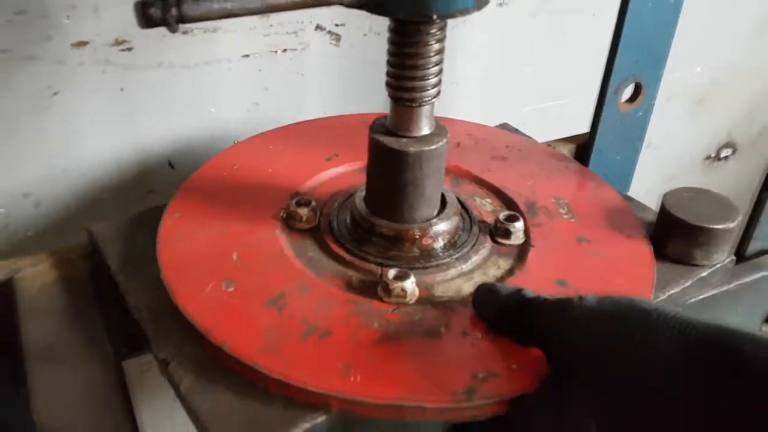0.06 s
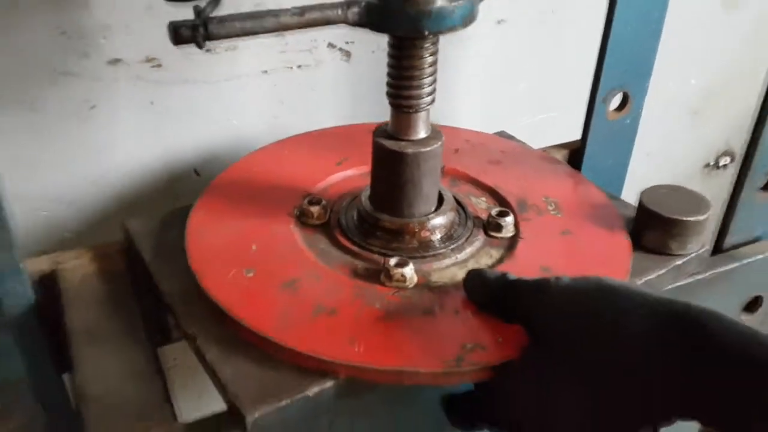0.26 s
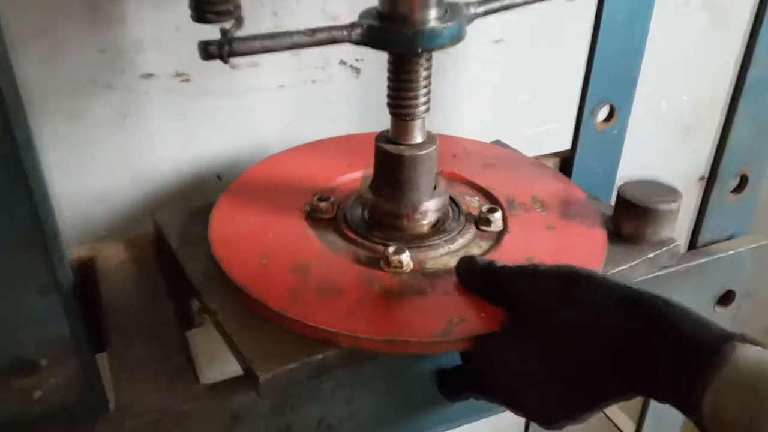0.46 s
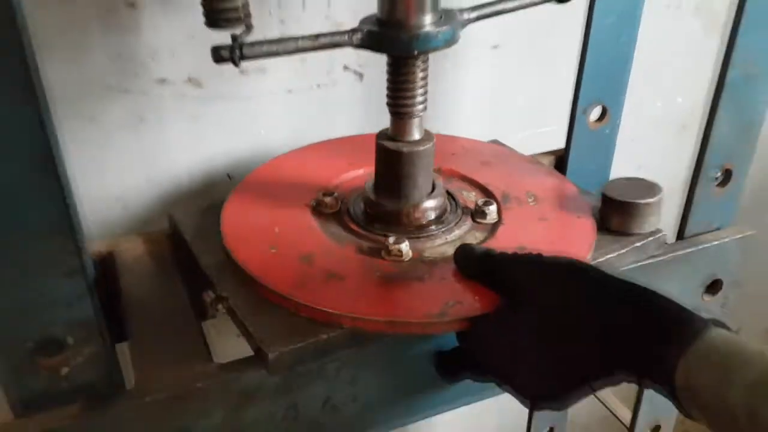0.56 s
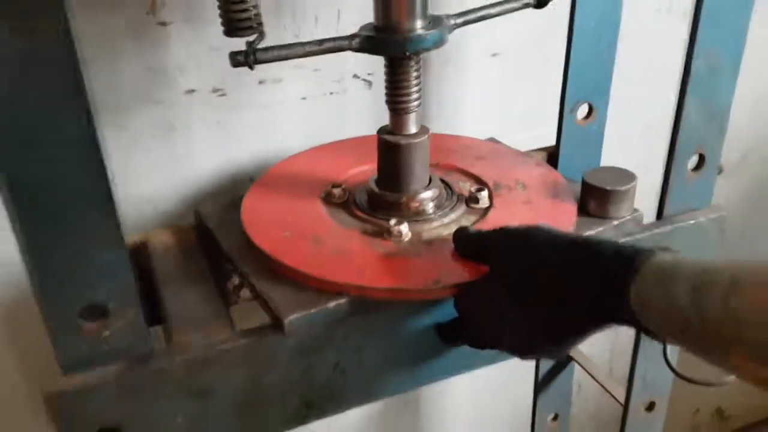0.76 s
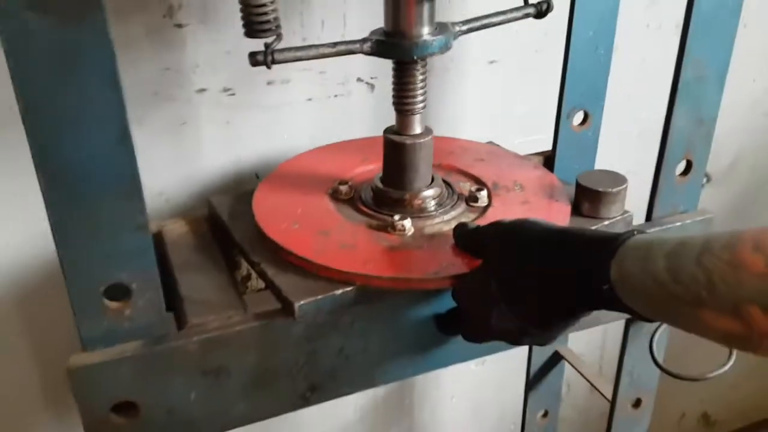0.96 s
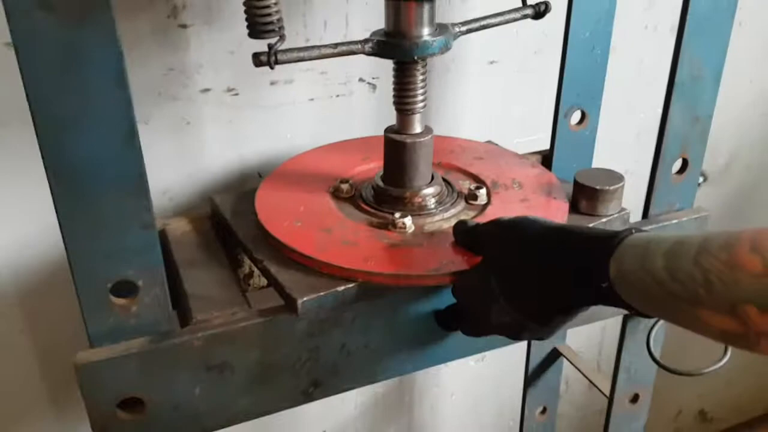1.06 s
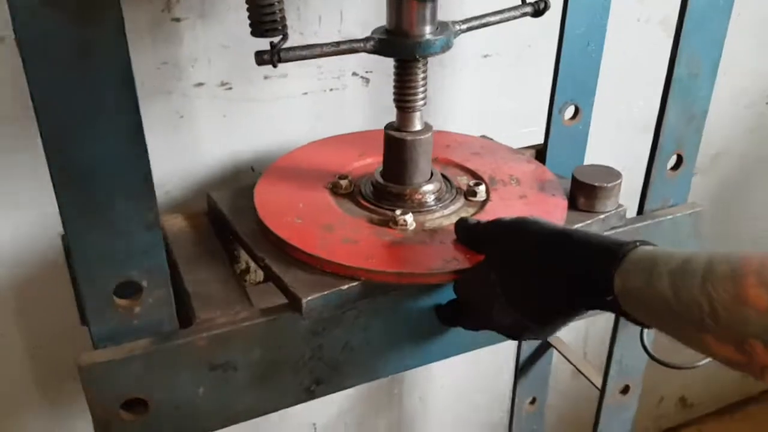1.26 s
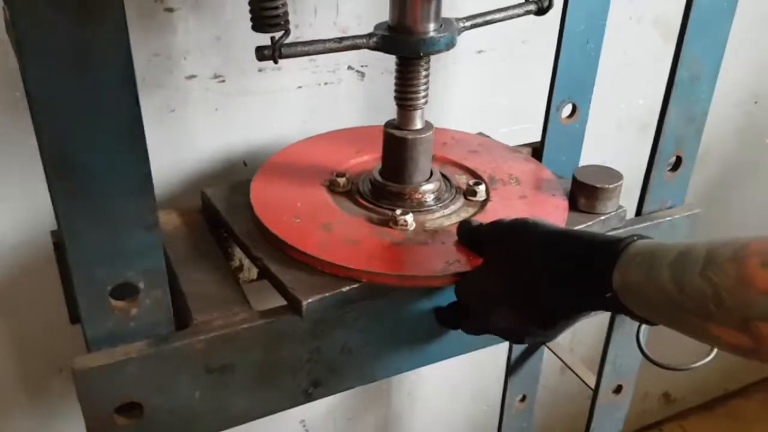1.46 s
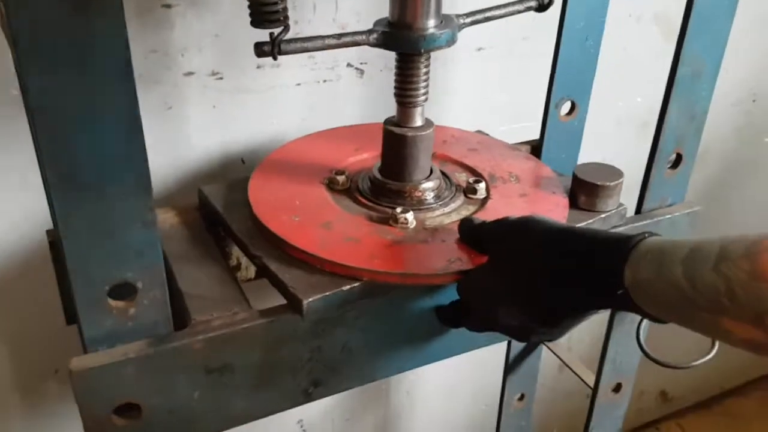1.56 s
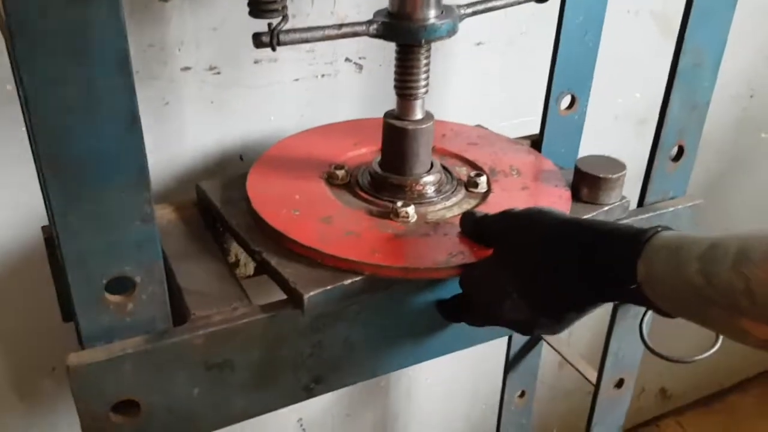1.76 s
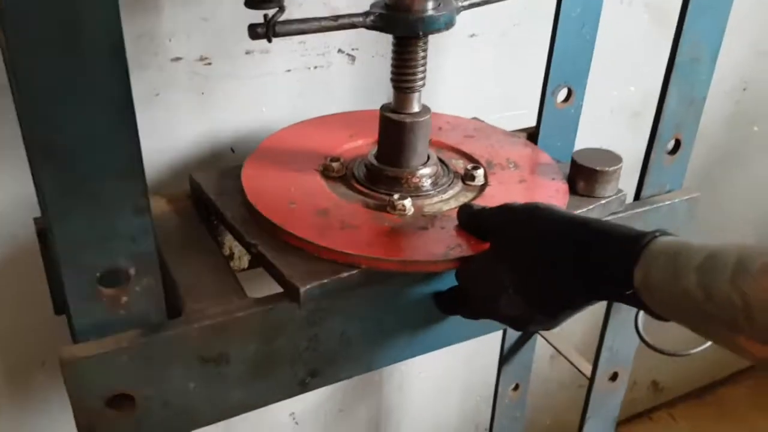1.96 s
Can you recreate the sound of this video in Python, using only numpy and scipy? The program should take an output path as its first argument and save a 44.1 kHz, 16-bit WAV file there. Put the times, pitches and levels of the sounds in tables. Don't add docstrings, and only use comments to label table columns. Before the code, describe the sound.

A wheel hub cracks out of its bearing in a press, already ringing at the start, then a short bright jolt and a longer stuttering one, with lever clacks between, close in a hard-walled workshop.

```python
import sys
import numpy as np
from scipy import signal
from scipy.fft import rfft, irfft, next_fast_len
from scipy.io import wavfile

SR = 44100
rng = np.random.default_rng(int(sys.argv[2]) if len(sys.argv) > 2 else 0)


def store_wav(level_fs):
    pcm = np.round(np.clip(np.atleast_2d(level_fs), -1, 1) * 32767)
    wavfile.write(sys.argv[1], SR, pcm.T.astype(np.int16))


def undo_db(level):
    steps = np.asarray(level, float) / 20
    return 10 ** steps


N = 89258

# (frequency [Hz], left-right likeness [-1 to 1])
LIKENESS = [(60, 0.74), (150, 0.89), (380, 0.98), (950, 0.35), (2380, -0.11), (5980, 0.5), (15000, -0.55)]
# (frequency [Hz], level [dB])
LEFT_OVER_RIGHT = [(60, 8), (180, 1), (550, -1), (1650, 5.5), (4970, 7), (15000, -0.5)]
# (time [s], level [dB], length of slip run [s], tilt [dB per octave], frame level [dB])
JOLTS = [
    (-.035, -16.5, 0.0074, 3.5, -12.5),
    (.693, -19, 0.014, -0.16, -4),
    (1.326, -19.5, 0.16, 0, 0),
]
TREBLE_LAG_S = .005


def at_hz(points, hz):
    table = np.array(points)
    return np.interp(np.log(hz), np.log(table[:, 0]), table[:, 1])


def port_gain(hz):
    return undo_db(at_hz(LEFT_OVER_RIGHT, hz) * np.array([[.5], [-.5]]))


def rms_one(x):
    return x / np.sqrt(np.mean(x ** 2) + 1e-20)


def energy_one(x):
    return x / np.sqrt(np.sum(x ** 2) / 2 + 1e-20)


def through(x, response):
    return signal.fftconvolve(np.atleast_2d(x), response, axes=1)[:, :x.shape[-1]]


def bandpass(x, order, low_hz, high_hz):
    return signal.sosfilt(signal.butter(order, [low_hz, high_hz], "band", fs=SR, output="sos"), x)


def stored(energy, t60):
    return signal.lfilter([1], [1, -undo_db(-120 / (max(t60, .002) * SR))], energy + 1e-18)


def banded_noise(spectrum, shape=lambda hz: 1, size=N):
    out = 0
    edges = 22 * 2 ** np.arange(0, 9.8, 1 / 3)
    white = rng.standard_normal((2, 2, size + 4000))
    for k, (low, high) in enumerate(zip(edges, edges[1:])):
        mid, side = bandpass(white[k % 2], 2, low, high)[:, 4000:]
        hz = np.sqrt(low * high)
        alike = np.clip(at_hz(LIKENESS, hz), -.1, 1)
        both = np.sqrt(1 + alike) * mid + np.sqrt(1 - alike) * side * [[1], [-1]]
        out = out + undo_db(at_hz(spectrum, hz)) * port_gain(hz) * shape(hz) * both
    return out


def hum(x, peaks):
    out = x
    for hz, width_hz, db in peaks:
        r = np.exp(-np.pi * width_hz / SR)
        poles = [1, -2 * r * np.cos(2 * np.pi * hz / SR), r * r]
        out = out + undo_db(db) * signal.lfilter([(1 - r * r) / 2, 0, (r * r - 1) / 2], poles, x)
    return out


def ringing(modes, longest, spread_db=2):
    t, out = np.arange(SR) / SR, 0
    for hz, db, t60 in modes:
        turn = np.arccos(np.clip(at_hz(LIKENESS, hz), -1, 1)) * np.array([[0], [1]])
        fall_db = 60 * t / min(t60, longest)
        gain = undo_db(db + spread_db * rng.standard_normal() - fall_db) * port_gain(hz)
        rise = 1 - np.exp(-t / (TREBLE_LAG_S * min(hz / 2000, 1) ** 2))
        out = out + gain * rise * np.sin(2 * np.pi * hz * t + turn + rng.uniform(-1.18, 1))
    return out / np.sqrt(np.mean(out[:, :SR // 20] ** 2))


def floor():
    # (frequency [Hz], density [dB per Hz])
    spectrum = [(20, -37), (60, -66), (300, -10.5), (640, -7), (1100, -17), (1900, -10.5), (5000, -24),
                (16000, -67)]
    return undo_db(-43) * rms_one(banded_noise(spectrum))


def workshop():
    # (frequency [Hz], t60 [s])
    t60s = [(100, 0.5), (400, 1.21), (1500, 1.74), (5000, 0.65), (14000, 1.52)]
    # (frequency [Hz], level [dB])
    colour = [(60, 1.5), (400, 2.5), (2000, -2), (6000, -1), (15000, -12)]
    size = 3 * SR // 2
    age, onset_s = np.arange(size) / SR, 0.006

    def dying(hz):
        return undo_db(-60 * age / max(at_hz(t60s, hz), .01))
    return energy_one(banded_noise(colour, dying, size=size) * (1 - np.exp(-age / onset_s)))


def room_sound(wet):
    # (frequency [Hz], width [Hz], level [dB])
    modes = [(1733, 57, 4), (642.3, 25, -1), (388.7, 7.6, -5.5), (575, 6.7, 2.5), (252, 13.3, 1.5)]
    # (time [s], level [dB])
    heard = [
        (0, 2.5),
        (.55, 0.5),
        (1.3, 2),
        (1.7, -3),
        (1.82, -4.5),
        (2.02, -0.5),
    ]
    gain = undo_db(np.interp(np.arange(N) / SR, *np.transpose(heard)))
    return gain * hum(wet + floor(), modes)


def rumble():
    # (time [s], level [dB])
    strain = [
        (0, -41),
        (.45, -59),
        (.7, -43.5),
        (1.002, -47.5),
        (1.302, -40),
        (1.65, -40.5),
        (1.8, -47.5),
        (2.02, -57),
    ]
    centre_hz, width_hz, broad_db, side_db = 115.3, 64, -16, -20.5
    white = rng.standard_normal((2, 1, N + 8000))
    white = white + undo_db(side_db) * rng.standard_normal((2, 1, N + 8000)) * [[1], [-1]]
    shudder = bandpass(white[0], 1, centre_hz - width_hz / 2, centre_hz + width_hz / 2)[:, 8000:]
    broad = bandpass(white[1], 2, 45, 110)[:, 8000:]
    level = undo_db(np.interp(np.arange(N) / SR, *np.transpose(strain)))
    return level * (rms_one(shudder) + undo_db(broad_db) * rms_one(broad))


def clacks(t):
    # (time [s], level [dB], decay [s], tilt [dB per octave], ring frequency [Hz])
    contacts = [(0.033, -45, 0.0013, 2, 8400), (0.043, -42, 0.0019, 11.5, 8350),
                (0.2215, -39, 0.0033, -3, 9000), (0.2294, -32.5, 0.0045, -0.5, 4870),
                (0.549, -47.5, 0.01, 0, 4160), (0.634, -56, 0.0037, 18, 13100),
                (0.637, -26, 0.0042, 7, 8340), (.638, -32.5, 0.014, -3.5, 517),
                (0.982, -44, 0.024, 4, 10500), (1.009, -35, 0.032, -3.5, 2500),
                (1.046, -19.5, 0.002, 5, 4330), (1.229, -28.5, 0.0059, 3, 2480),
                (1.239, -43, 0.0039, 3, 4440), (1.295, -25.5, 0.0034, 6.5, 13300),
                (1.299, -26, 0.022, -3.5, 2260), (.705, -30.5, 0.0081, 2.5, 5270),
                (1.329, -26, 0.028, -4, 5200), (1.636, -37, 0.0052, -1, 14630),
                (1.641, -37, 0.02, -1.5, 993), (1.669, -32, 0.0072, 1, 3860),
                (1.677, -32.5, 0.0028, -3, 7900), (1.676, -33, 0.0023, -1, 8440),
                (1.9108, -35, 0.0056, 0.5, 4200), (1.993, -22.5, 0.0059, 0.5, 8900),
                (1.997, -31, 0.018, -3.5, 1015)]
    # (frequency [Hz], density [dB per Hz])
    linkage = [(150, -20.5), (500, 1), (1000, 5), (2200, 13), (4400, 7.5), (8500, -5.5), (10500, -7.5),
               (16000, -9.5)]
    # (frequency [Hz], t60 [s])
    linkage_t60 = [(300, 0.37), (2000, 0.33), (6000, 0.25), (14000, 0.33)]
    # (frequency [Hz], width [Hz], level [dB])
    lever_hum = [(8700, 710, -3), (4900, 160, -11), (12700, 110, -25), (5200, 750, -18), (14700, 180, -17)]
    ring_cycles, tail_db = 28, -7
    size, rings, snaps = SR // 4, np.zeros((2, len(t) + SR)), []
    age = np.arange(size) / SR
    for s, db, decay, tilt_db, ring_hz in contacts:
        grit = rng.standard_normal((2, size))
        rise = 1 - np.exp(-age / (0.15 * decay))
        snap = undo_db(db) * np.exp(-age / decay) * rise
        start = np.searchsorted(t, s)
        r, w = undo_db(-60 * ring_hz / (ring_cycles * SR)), 2 * np.pi * ring_hz / SR
        ring = signal.lfilter([1, 0, -1], [1, -2 * r * np.cos(w), r * r], grit * snap)
        rings[:, start:start + size] += port_gain(ring_hz) * np.sqrt(1 - r * r) * ring
        snaps.append((start, snap ** 2, tilt_db))

    def shape(hz):
        energy = np.zeros(len(t) + SR)
        for start, power, tilt_db in snaps:
            energy[start:start + size] += power * undo_db(2 * tilt_db * np.log2(hz / 4000))
        tail = stored(energy, at_hz(linkage_t60, hz)) / (.004 * SR)
        return np.sqrt(energy + undo_db(2 * tail_db) * tail)[:len(t)]
    return rings[:, :len(t)] + undo_db(2) * hum(banded_noise(linkage, shape, size=len(t)), lever_hum)


def pings(t):
    # (time [s], level [dB], frequency [Hz], t60 [s])
    plate_ring = [
        (.700, -20.5, 3025, .3),
        (.704, -28, 3145, .3),
        (1.0462, -14, 4420, .035),
        (1.0, -41, 576, 2.5),
        (1.05, -41, 253, 1.5),
        (.8, -33, 485, .8),
    ]
    # (time [s], level [dB], frequency [Hz], t60 [s])
    struck = [(0.225, -41, 8300, 0.066), (0.23, -28, 4050, 0.054), (.551, -39, 5050, 0.089),
              (.639, -28, 3520, 0.15), (.702, -22.5, 3594, 0.12), (0.766, -29.5, 146.5, 0.25),
              (1.0117, -25, 2650, 0.098), (1.0465, -25.5, 8700, 0.074), (1.047, -39, 2410, 0.043),
              (1.301, -19.5, 3690, 0.25), (1.408, -29.5, 138.7, 0.3), (1.676, -21, 5070, 0.038),
              (1.679, -24.5, 8400, 0.024), (1.911, -36.5, 3730, 0.13), (1.914, -30, 2280, 0.044),
              (1.996, -42, 1770, 0.22), (1.996, -21.5, 2710, 0.086)]
    # (time [s], level [dB], frequency [Hz], t60 [s])
    ticks = [(0.043, -37, 7660, .02), (.044, -34, 8400, .02), (.222, -27, 4980, 0.036),
             (.23, -27, 5000, 0.036), (.231, -38, 6600, 0.045), (0.23, -39, 8450, .03),
             (0.549, -36, 3950, 0.065), (0.55, -47, 6760, 0.14), (.551, -51, 9200, 0.069),
             (0.637, -25, 6050, .03), (.638, -38, 8900, 0.022), (.64, -31, 2120, 0.12),
             (1.015, -47, 4900, 0.087), (1.024, -32, 1680, 0.073), (1.0465, -25, 6750, .025),
             (1.0465, -34, 10900, 0.019), (1.048, -19, 2240, 0.034), (1.229, -33.5, 4200, .04),
             (1.33, -19, 780, 0.11), (1.333, -21, 952, 0.14), (1.642, -48, 5440, .1),
             (1.669, -21, 4020, 0.034), (1.91, -42, 7200, 0.042), (1.995, -56, 5000, .03),
             (1.995, -28, 6130, .03), (1.997, -26, 986, 0.13)]
    twin_ratio = 1.011
    rough, flicker_hz = 0.33, 120
    out = np.zeros((2, len(t)))
    low = signal.butter(2, flicker_hz, fs=SR, output="sos")
    flicker = signal.sosfilt(low, rng.standard_normal((2, len(t))))
    for s, db, hz, t60 in list(plate_ring) + list(struck) + list(ticks):
        age = np.maximum(t - s, 0)
        apart = 1 - np.clip(at_hz(LIKENESS, hz), 0, 1)
        phase, twin_phase = apart * rng.uniform(0, np.pi / 2, (2, 2, 1))
        gain = undo_db(db - 60 * age / t60) * port_gain(hz) * (1 - np.exp(-age * hz / 3))
        turn = 2 * np.pi * hz * age
        out += gain * (np.sin(turn + phase) + 0.21 * np.sin(turn * twin_ratio + twin_phase))
    return out * (1 + rough * rms_one(flicker))


def slip_runs(t):
    # (time [s], level against the jolt [dB])
    larger = [(-.02, -3.5), (.004, -10), (.02, -22), (0.043, -11), (0.692, -2.5), (0.6974, 0.5), (.706, -3),
              (.716, -9.5), (0.736, -23), (.757, -6.5), (1.3265, 0.5), (1.331, -3), (1.341, -0.5),
              (1.348, -3), (1.359, -3.5), (1.378, -8), (1.391, -17), (1.408, -14), (1.42, -24),
              (1.445, -15)]
    slips_per_s, small_db = 250, -16
    small = undo_db(small_db) * rng.choice([-1, 1], len(t)) * (rng.random(len(t)) < slips_per_s / SR)
    runs = []
    for s, db, length, _, _ in JOLTS:
        run = small * (t > s) * np.exp(-(np.maximum(t - s, 0) / length) ** 2)
        opening = [(s, 0)] if s < 0 else []
        for slip_s, slip_db in opening + list(larger):
            if -.002 < slip_s - s < .15:
                run[np.searchsorted(t, slip_s)] = -undo_db(slip_db)
        runs.append(undo_db(db) * run)
    return runs


def jolts(t):
    # (frequency [Hz], level [dB], t60 [s])
    frame = [(272, -5, .55), (300, -9, .3), (323, 1, .45), (350, -8, .25), (377, 2, .55), (412, -7, .3),
             (450, -8, .3), (487, -2, .5), (560, -10, .3), (641, -11, .3), (800, -10, .25), (947, -9, .3)]
    # (frequency [Hz], level [dB], t60 [s])
    plate = [(1570, -11, 0.15), (1610, -5.5, 0.31), (1680, -5, 0.55), (1754, -4.5, 0.69), (2060, -1, .4),
             (2150, -10, 0.53), (2250, -10, 0.41), (2550, -4, 0.35), (2630, -3.5, 0.34), (2740, -16, 0.33),
             (2775, 1, .2), (2850, -3, 0.27)]
    # (frequency [Hz], density [dB per Hz])
    body = [(100, -37), (340, 1.5), (560, -8), (800, -0.5), (1350, -8.5), (1800, -2.5), (3100, -11),
            (4200, -20), (16000, -47.5)]
    # (frequency [Hz], t60 [s])
    body_t60 = [(100, 1), (400, 0.52), (1500, 0.46), (5000, 0.52), (14000, 0.21)]
    seats_s = [
        0.041,
        .768,
        1.44,
    ]
    seat_db, seat_s = -4.5, 0.011
    plate_db, lesser_db = -8.5, -10
    push_db, push_hz, push_t60 = -20.5, 397, 0.024
    modes, runs = 0, slip_runs(t)
    seats = [undo_db(seat_db * np.clip((t - s) / seat_s, 0, 1)) for s in seats_s]
    for run, seat, (_, _, _, _, frame_db) in zip(runs, seats, JOLTS):
        blow = run * np.where(run == run.min(), 1, undo_db(lesser_db))
        ring = undo_db(frame_db) * ringing(frame, .55, spread_db=1) + undo_db(plate_db) * ringing(plate, 0.4)
        push = undo_db(push_db) * ringing([(push_hz, 0, push_t60)], 1)
        modes = modes + seat * through(blow, ring) + through(run, push)

    def shape(hz):
        energy = 0
        for run, seat, (_, _, _, tilt_db, _) in zip(runs, seats, JOLTS):
            fed = (run * undo_db(tilt_db * np.log2(hz / 1000))) ** 2
            energy = energy + seat ** 2 * stored(fed, at_hz(body_t60, hz))
        lag = np.exp(-1 / (SR * TREBLE_LAG_S * min(hz / 2000, 1.5)))
        return np.sqrt(signal.lfilter([1 - lag], [1, -lag], energy))
    return modes + undo_db(9.5) * banded_noise(body, shape, size=len(t))


def scene():
    lead = int(.1 * SR)
    t = np.arange(-lead, N) / SR
    jolt = signal.sosfilt(signal.butter(3, 130, "high", fs=SR, output="sos"), jolts(t))
    clack, ping = clacks(t), pings(t)
    to_room = undo_db(-12) * jolt.mean(0) + undo_db(-10.5) * clack.mean(0) + undo_db(-15.5) * ping.mean(0)
    wet = through(to_room, workshop())[:, lead:]
    return (jolt + clack + ping)[:, lead:] + room_sound(wet) + rumble()


def top_cut(x):
    return signal.sosfilt(signal.butter(12, 16490, fs=SR, output="sos"), x)


def record(dry):
    right_lag_s, cutoff_hz = .00012, 16600
    size = next_fast_len(N)
    lag_s = right_lag_s * np.array([[0], [1]])
    late = np.exp(-2j * np.pi * np.fft.rfftfreq(size, 1 / SR) * lag_s)
    ports = irfft(rfft(dry, size) * late, size)[:, :N]
    mix = signal.sosfilt(signal.cheby2(8, 36, cutoff_hz, fs=SR, output="sos"), ports)
    return top_cut(mix)


dry = scene()
out = record(dry)
store_wav(out)
```